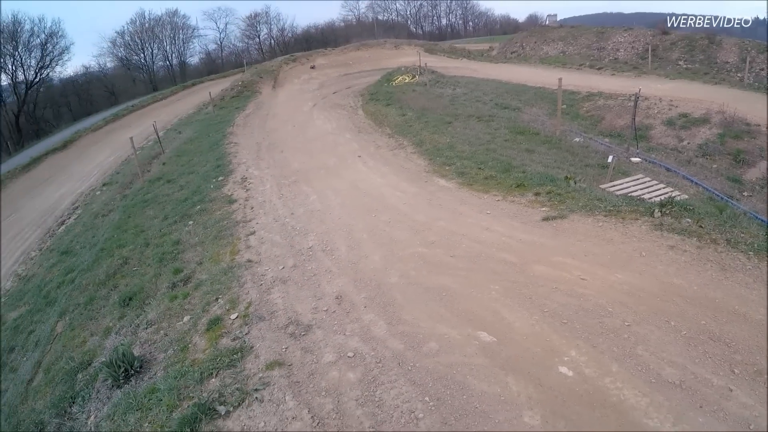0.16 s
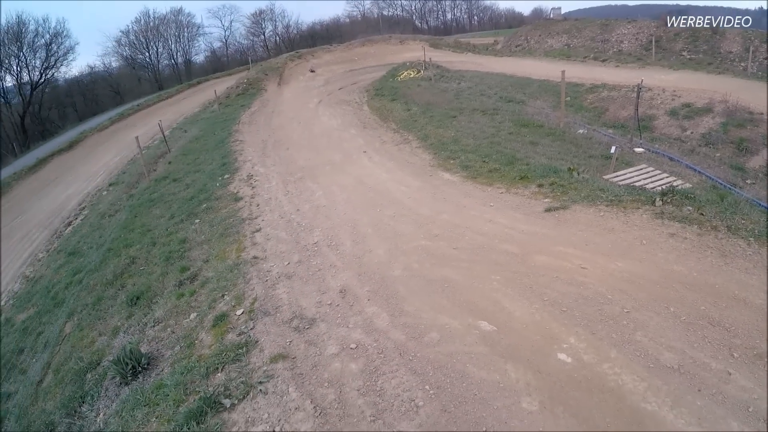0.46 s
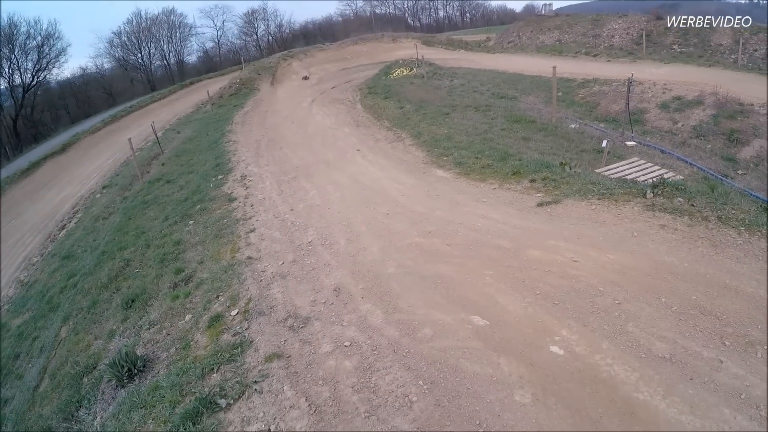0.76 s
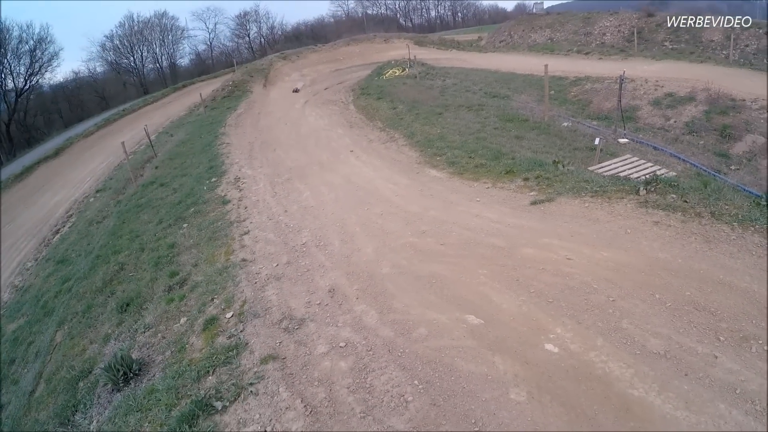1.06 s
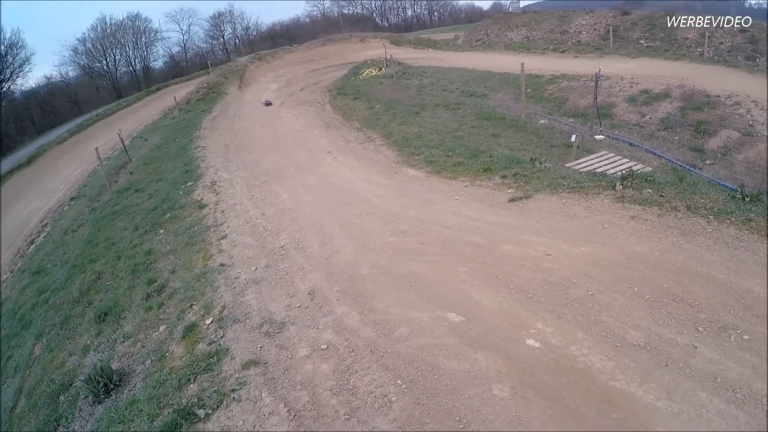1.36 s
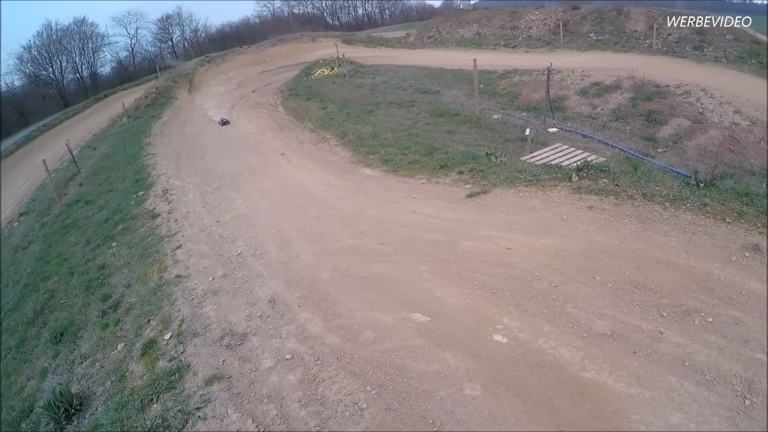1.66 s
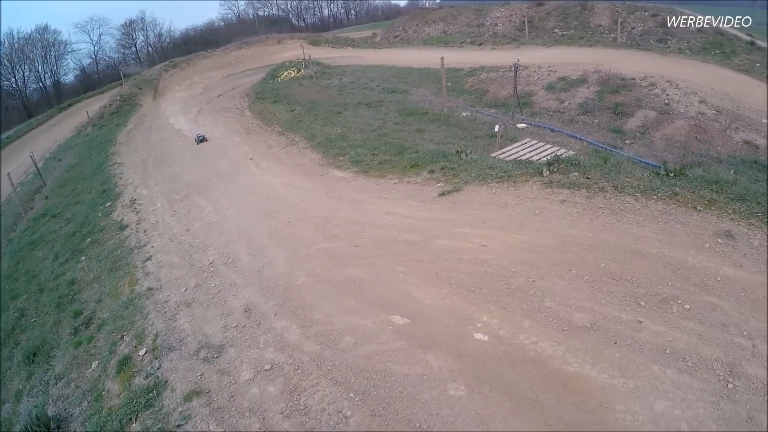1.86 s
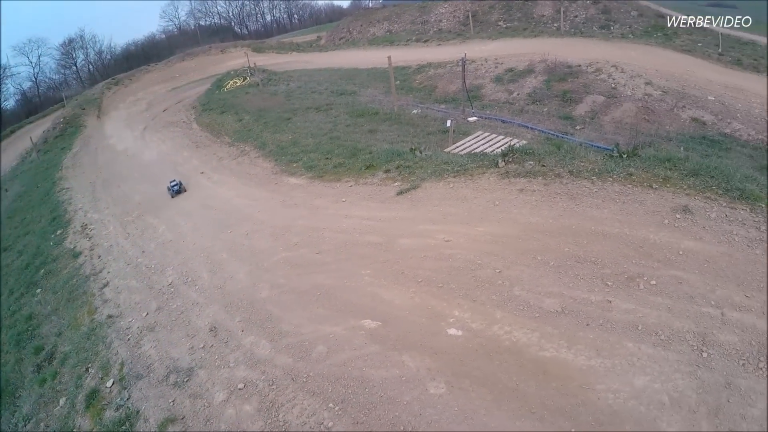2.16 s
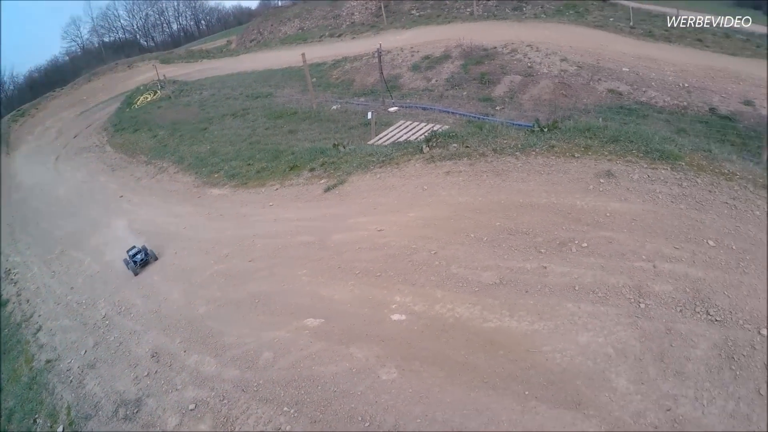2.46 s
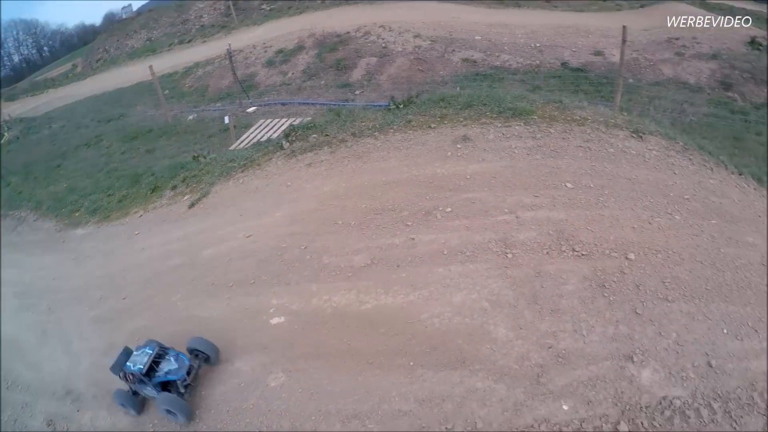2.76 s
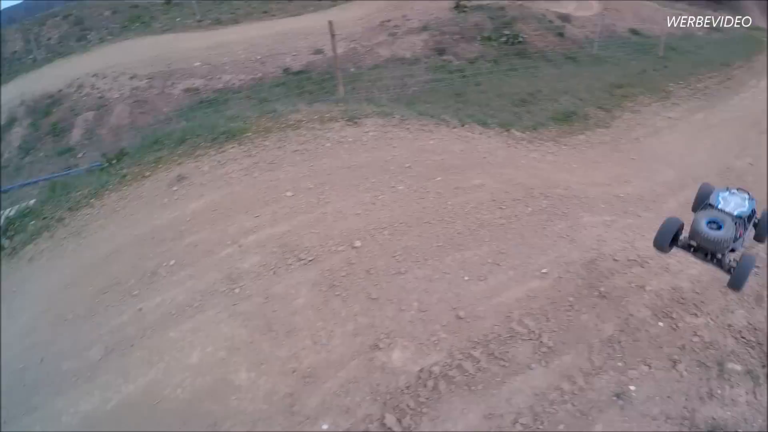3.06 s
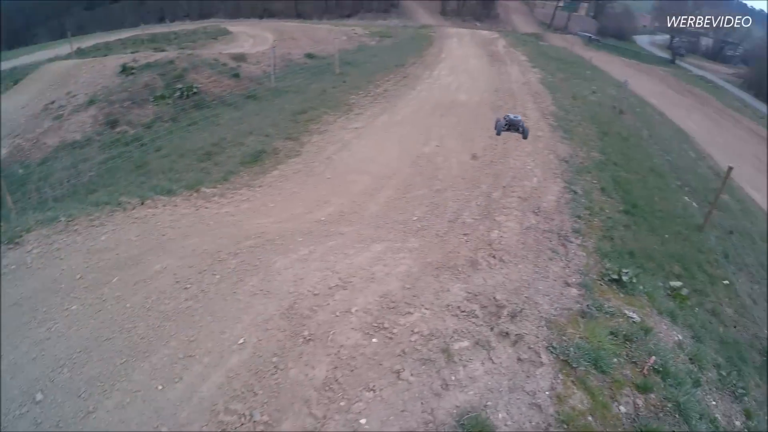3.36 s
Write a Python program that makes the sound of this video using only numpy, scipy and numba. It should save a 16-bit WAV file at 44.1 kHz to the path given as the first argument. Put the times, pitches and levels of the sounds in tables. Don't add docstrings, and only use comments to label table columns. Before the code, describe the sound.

Distant high whine of a toy-sized electric car on a dirt track, chattering over bumps, grows into a sharp spray of grit right beside the microphone, then recedes; low gusts thump throughout the open field.

```python
import sys
import numpy as np
from scipy import signal
from scipy.fft import rfft, irfft
from scipy.io import wavfile
from scipy.ndimage import uniform_filter1d, map_coordinates
from numba import njit

SR = 44100
rng = np.random.default_rng(int(sys.argv[2]) if len(sys.argv) > 2 else 0)


def linear_from_db(decibels):
    return 10 ** (np.asarray(decibels, float) / 20)


def digitize_waveform(pressure):
    field = np.atleast_2d(pressure).T
    bounded = np.clip(field, -1, 1)
    quanta = np.round(bounded * 32767).astype(np.int16)
    wavfile.write(sys.argv[1], SR, quanta)


N = 154350

# time in seconds, level in dB.
WIND_STRENGTH = [(0, -28.5), (.1, -34), (.6, -29.5), (.72, -27), (.95, -34.5), (1.25, -25), (1.45, -27),
                 (1.7, -21), (1.86, -20.5), (2.07, -20.5), (2.3, -18), (2.52, -13), (2.815, -13.5),
                 (2.832, -20), (3.07, -29.5), (3.15, -26.5), (3.28, -30.5), (3.5, -28.5)]
# frequency in Hz, level in dB.
WIND_COLOUR = [(20, -15), (45, 0), (75, 1), (140, -2.5), (220, -11), (350, -28), (700, -36), (1500, -60)]
# centre in seconds, length in seconds, lift in dB
EDDIES_AND_LULLS = [(0.194, 0.012, 7), (0.44, .04, 6.5), (0.623, 0.017, 12), (0.8, 0.041, 3), (0.894, 0.024, 10),
                    (1.022, 0.068, 17.5), (1.11, 0.044, 3.5), (1.17, 0.02, 12), (1.323, 0.077, 4.5), (1.495, 0.11, 9),
                    (1.595, 0.05, 12.5), (1.668, 0.041, 7), (1.728, 0.062, 7.5), (1.785, 0.03, 12.5),
                    (1.933, 0.054, 7.5), (1.993, 0.05, 10.5), (2.147, 0.037, 11), (2.233, 0.033, 5.5),
                    (2.29, 0.04, 5.5), (2.404, 0.019, 7), (2.531, 0.026, 2), (2.63, 0.045, 2), (2.764, 0.042, 2.5),
                    (2.929, 0.027, 11), (2.996, 0.045, 7), (3.115, 0.03, 8),
                    (1.8, 0.016, -4), (1.86, 0.099, -1), (2.066, 0.13, -1.5), (2.5, .035, -8), (2.313, .035, -4.5),
         (2.7, 0.045, -3), (2.575, 0.016, -5.5), (2.6, 0.031, 9), (3.195, 0.0078, 4.5), (3.2, 0.018, 3),
         (2.496, 0.035, 4), (1.4, .05, 1), (1.6, 0.012, 0.5)]
# time in seconds, level in dB, frequency in Hz.
WIND_POPS = [
    (1.581, -20, 760),
    (2.147, -22.5, 520),
    (2.238, -24.5, 450),
    (2.6, -17, 650),
    (2.54, -23, 250),
]

# centre in seconds, length in seconds, frequency in Hz, width in Hz, level in dB.
BODY_NOTES = [(2.43, .18, 2300, 660, -34), (2.77, 0.13, 2160, 305, -31.5), (2.92, 0.056, 2150, 110, -27.5),
              (2.922, .05, 1800, 90, -25), (2.99, 0.044, 2180, 170, -27.5), (2.995, 0.13, 1730, 100, -29),
              (2.987, 0.12, 627, 124, -27), (3.07, 0.14, 1100, 48, -28.5), (3.16, .14, 1642, 80, -36),
              (3.19, 0.064, 1110, 75, -36), (3.12, 0.19, 3450, 240, -31.5), (0.325, .14, 2750, 400, -49)]

# time in seconds, peak level in dB.
KNOCKS = [(0.6318, -34), (0.6494, -32), (0.6804, -36), (0.869, -30.5), (1.0333, -50), (1.0712, -39),
          (1.1329, -31), (1.153, -28), (1.2021, -40), (1.2993, -33), (1.3341, -35), (1.353, -34),
          (1.3949, -35), (1.4388, -30.5), (1.4607, -32), (1.5231, -27), (1.645, -43), (1.6921, -38),
          (1.7172, -30.5), (1.7369, -33), (1.7607, -30), (1.806, -33), (1.8589, -25.5), (1.868, -34),
          (1.8873, -28), (1.9036, -25), (1.9611, -26), (2.0534, -48), (2.0743, -29.5), (2.1435, -28.5),
          (2.1753, -31), (2.213, -38)]
# frequency in Hz, level in dB, time to fall 60 dB in seconds.
PLASTIC_MODES = [(2643, 2.5, 0.033), (2970, -2, 0.02), (2410, -21, 0.017), (4580, -8, 0.038)]

# time in seconds, level in dB, share heard from behind (0 to 1).
TYRE_PATH = [(0, -37.5, 1), (.3, -35.5, 0.15), (.85, -36, 0.7), (.94, -38.5, 0.1), (1.05, -37.5, 0.4),
             (1.9, -33, 0.6), (2.05, -35.5, 0.01), (2.3, -35.5, 0), (2.35, -30, 0.1), (2.52, -31.5, 0),
             (2.6, -30.5, 0), (2.84, -25, 0), (2.856, -18, 0.17), (2.96, -17, 0), (3.06, -17, 0.68),
             (3.12, -21.5, 1), (3.144, -25, 0.6), (3.3, -29.5, 0.6), (3.5, -31.5, 0.73)]
# frequency in Hz, level in dB.
FAR_COLOUR = [(250, -12), (800, 2.5), (1700, -5.5), (4300, -15.5), (5900, -10.5), (6850, -38),
              (8300, -21.5), (15000, -47)]
# frequency in Hz, level in dB.
NEAR_COLOUR = [(260, -12.5), (700, -10.5), (2100, -2), (3000, -5.5), (5600, -6), (7000, -19.5),
               (11500, -31), (15000, -38)]
# frequency in Hz, width in Hz, level in dB.
FRONT_MODES = [(623, 520, -9.5), (1718, 100, -21.5), (2220, 830, -20.5), (3930, 240, -23),
               (5480, 2200, -9.5)]
# frequency in Hz, width in Hz, level in dB.
REAR_MODES = [(1270, 450, -13.5), (1610, 150, -14), (2035, 140, -19.5), (3560, 690, -12), (4880, 530, -12)]
# frequency in Hz, level in dB.
SAND_COLOUR = [(5000, -37), (6800, -1), (8300, -1), (11500, -5.5), (13000, -12), (15000, -22)]
# frequency in Hz, width in Hz.
STONE_MODES = [(11200, 1500), (12900, 1200)]
STONE_DB = [-43, -49]
# centre in seconds, length in seconds, level in dB.
RUTS = [
    (0.177, 0.078, -39),
    (0.444, 0.21, -37.5),
    (0.729, .2, -39),
]

# time in seconds, pitch in Hz, level in dB.
PULL_AWAY = [
    (.14, 3200, -67.5),
    (.165, 3226, -42.5),
    (.2, 3170, -46.5),
    (.235, 3440, -43),
    (.27, 3850, -51),
]
# time in seconds, pitch in Hz, level in dB.
BURSTS = [
    [(.33, 4650, -52), (.35, 4700, -37), (.375, 4886, -37), (.385, 4864, -41), (.416, 5090, -30.5),
     (.43, 4730, -47), (.46, 4860, -43), (.49, 5120, -46)],
    [(.515, 4857, -47), (.53, 4856, -44), (.552, 4990, -37), (.58, 5030, -41.5), (.61, 5170, -40.5),
     (.64, 5280, -40), (.68, 5250, -45)],
    [(.69, 5368, -45), (.7, 5400, -40.5), (.74, 5520, -45), (.76, 4930, -40.5), (.786, 4570, -48),
     (.812, 4830, -36), (.83, 4860, -51), (.87, 4900, -42)],
    [(1.0, 5080, -50), (1.014, 4950, -37), (1.03, 4880, -50), (1.048, 4875, -38), (1.065, 5020, -43),
     (1.09, 5270, -45), (1.12, 5360, -54)],
    [(1.175, 5250, -47), (1.189, 5040, -44), (1.232, 5060, -36), (1.245, 5240, -42), (1.262, 5250, -41),
     (1.29, 5400, -39), (1.32, 5313, -30)],
    [(1.325, 5310, -38), (1.353, 5455, -43), (1.385, 5365, -34), (1.403, 5230, -38), (1.431, 5345, -34),
     (1.453, 5560, -47), (1.48, 5560, -51)],
    [(1.65, 5000, -49.5), (1.67, 5100, -40), (1.706, 5328, -34), (1.725, 5480, -47), (1.775, 5620, -46)],
    [(1.78, 5600, -45), (1.796, 5204, -32.5), (1.814, 5120, -40.5), (1.836, 5350, -32), (1.864, 5549, -41),
     (1.9, 5630, -46), (1.918, 5510, -40), (1.94, 5320, -34), (1.96, 5425, -29.5)],
    [(1.968, 5340, -44), (2.01, 5340, -46)],
]


def unit(x):
    return x / np.sqrt(np.mean(x ** 2))


def colour(x, shape):
    hz, db = np.array(shape).T
    f = np.maximum(np.arange(N // 2 + 1) * SR / N, 1)
    gain = linear_from_db(np.interp(np.log(f), np.log(hz), db, right=-90))
    return unit(irfft(rfft(x) * gain, N))


@njit
def moving_resonance(x, hz, width, dt):
    y, b, l = np.empty(len(x)), 0., 0.
    for i in range(len(x)):
        g, k = np.tan(np.pi * hz[i] * dt), width / hz[i]
        v = (b + g * (x[i] - l)) / (1 + g * (g + k))
        b, l, y[i] = 2 * v - b, l + 2 * g * v, k * v
    return y


def band(x, hz, width_hz):
    hz = np.ones(N) * hz
    once = moving_resonance(x, hz, 1. * width_hz, 1 / SR)
    return unit(moving_resonance(once, hz, 1. * width_hz, 1 / SR))


def noise():
    return rng.standard_normal(N)


def walk(rate):
    k = int(SR / rate)
    steps = np.repeat(rng.standard_normal(N // k + 1), k)
    return unit(uniform_filter1d(uniform_filter1d(steps, k), k)[:N])


def even(x, hz):
    swell = uniform_filter1d(np.abs(x), int(1.5 * SR / hz) + 1)
    return unit(x / (swell + .15) ** .8)


def wind_pops(t):
    length_s = 0.0035
    return sum(linear_from_db(db) * np.exp(-((t - at) / length_s) ** 2) * band(noise(), f, 0.54 * f)
               for at, db, f in WIND_POPS)


def wind(t):
    tilt, deep_lag = 0.65, 0.14
    eddy_reach = 0.24
    s, db = np.array(WIND_STRENGTH).T
    eddies = sum(lift * np.exp(-(2 * (t - at) / length) ** 4) for at, length, lift in EDDIES_AND_LULLS)
    gust = np.interp(t, s, db) + eddies + .4 * walk(20)
    hzs, dbs = np.array(WIND_COLOUR).T
    rumble = 0
    for octave in np.arange(0, 6.1, .5):
        f = 24 * 2 ** octave
        high_tilt = tilt * max(octave - 2, 0)
        lift = (gust + 18) * (1 + high_tilt - deep_lag * max(2 - octave, 0))
        lift = lift - (1 - eddy_reach) * eddies * high_tilt
        level = linear_from_db(np.interp(np.log(f), np.log(hzs), dbs) + lift + 1.2 * walk(23.71))
        rumble = rumble + level * np.sqrt(f / 75) * even(band(noise(), f, f * 0.61), f)
    return rumble * linear_from_db(-22) + wind_pops(t)


def body_notes(t):
    sag_per_s = .12
    raw = noise()
    out = 0
    for at, length, f, width, db in BODY_NOTES:
        swell = np.exp(-(2 * (t - at) / length) ** 4)
        out = out + linear_from_db(db) * swell * band(raw, f * (1 - sag_per_s * (t - at)), width)
    return out


def rattle():
    size = 4410
    out, k = np.zeros(N + size), np.arange(size) / SR
    for (s, db), detune in zip(KNOCKS, rng.standard_normal((60, 4))):
        ring = 0
        for (f, g, t60), d in zip(PLASTIC_MODES, detune):
            ring = ring + linear_from_db(g) * np.sin(2 * np.pi * f * (1 + 0.017 * d) * k) * linear_from_db(-60 * k / t60)
        soft_start = 1 - np.exp(-k / .0018)
        out[int(s * SR):][:size] += linear_from_db(db + 1.5) * ring * soft_start
    return out[:N]


def grinding():
    grains_per_s, grain_share = 1500, .3
    grains = (rng.random(N) < grains_per_s / SR) * noise()
    mix = np.sqrt(1 - grain_share) * noise() + np.sqrt(grain_share) * unit(grains)
    return mix * linear_from_db(1.2 * walk(40.36))


def chassis(raw, modes):
    return sum(linear_from_db(g + 2.5 * walk(30.6)) * band(raw, f, w) for f, w, g in modes)


def far_patches(t, raw):
    out = 0
    for f, width in [(1000, 260), (1265 + 370 * t, 350)]:
        out = out + linear_from_db(-14.5 + 4.8 * walk(7.04)) * band(raw, f * (1 + 0.033 * walk(3.333)), width)
    rough_track = np.clip((t - 1.0) * 10, .25, 1)
    return out + rough_track * linear_from_db(-12 + 4 * walk(45)) * band(raw, 2660, 350)


def ruts(t, raw):
    swell = sum(linear_from_db(g) * np.exp(-(2 * (t - at) / length) ** 2) for at, length, g in RUTS)
    return swell * band(raw, 740, 890)


def sand_spray(t, db, raw):
    pass_s, pass_length_s = 2.985, 0.31
    shower_db = 4 * np.exp(-(2 * (t - pass_s) / pass_length_s) ** 16)
    level = linear_from_db(-33 + 1.4 * (db + 16.5) + shower_db + 3 * walk(100))
    return level * colour(raw, SAND_COLOUR)


def stone_ticks(db, near, raw):
    level = near ** 2 * linear_from_db(0.85 * (db + 17) + 3.5 * walk(80))
    return level * sum(linear_from_db(g) * band(raw, f, w) for (f, w), g in zip(STONE_MODES, STONE_DB))


def tyres(t):
    s, db, rear = np.array(TYRE_PATH).T
    db, rear = np.interp(t, s, db), np.clip(np.interp(t, s, rear), 0, 1)
    near = np.clip((db + 39) / 10, 0, 1)
    raw = grinding()
    close = colour(raw, NEAR_COLOUR)
    close = close + (1 - rear) * chassis(raw, FRONT_MODES) + rear * chassis(raw, REAR_MODES)
    far = colour(raw, FAR_COLOUR) + far_patches(t, raw)
    rolling = linear_from_db(db) * ((1 - near) * far + near * close)
    return rolling + sand_spray(t, db, raw) + ruts(t, raw) + stone_ticks(db, near, raw)


def off_the_ground(t, car):
    lag_s = 0.001054 * (1 - 0.037 * t)
    return car + linear_from_db(-20.5) * map_coordinates(car, [(t - lag_s) * SR], mode="mirror")


def gear_whine(t):
    bursts = [PULL_AWAY, *BURSTS]
    s, hz, db = np.vstack(bursts).T
    on = sum((t > rows[0][0]) & (t < rows[-1][0]) for rows in bursts)
    gain = linear_from_db(np.interp(t, s, db) + 3.4 * walk(70.2)) * uniform_filter1d(1. * on, size=500)
    pitch = np.interp(t, s, hz) * (1 + .007 * walk(90))
    tone = np.sqrt(2) * np.sin(2 * np.pi * np.cumsum(pitch) / SR)
    overtone = band(band(noise(), 2 * pitch, 1300), 10100, 1500)
    overtone = linear_from_db(-19.5 + 4 * walk(30.14)) * overtone
    hiss = linear_from_db(-2.5) * band(noise(), pitch, 400)
    return gain * (tone + overtone) + uniform_filter1d(gain, size=4000) * hiss


def scene():
    t = np.arange(N) / SR
    car = off_the_ground(t, tyres(t)) * linear_from_db(-1.05)
    return (wind(t) + body_notes(t) + rattle() + car + gear_whine(t))[None]


def band_limit(x):
    return signal.sosfilt(signal.butter(12, 15140, fs=SR, output="sos"), x)


def record(dry):
    rounded = np.tanh(1.059 * dry) / 1.232
    soft = signal.sosfilt(signal.butter(8, 14200, fs=SR, output="sos"), rounded)
    return band_limit(soft)


dry = scene()
out = record(dry)
digitize_waveform(out)
```